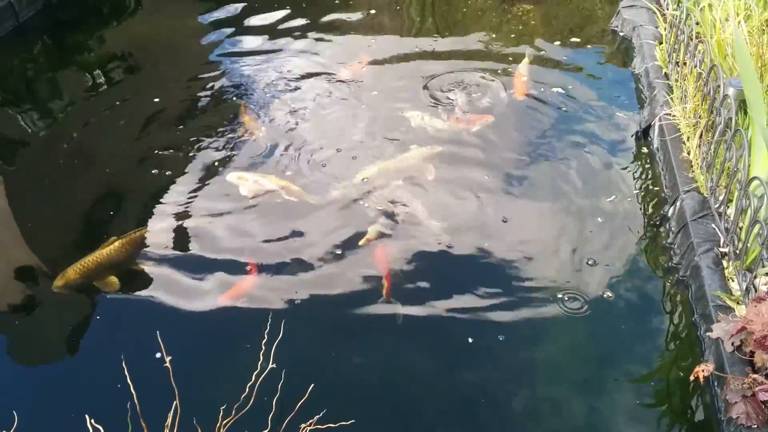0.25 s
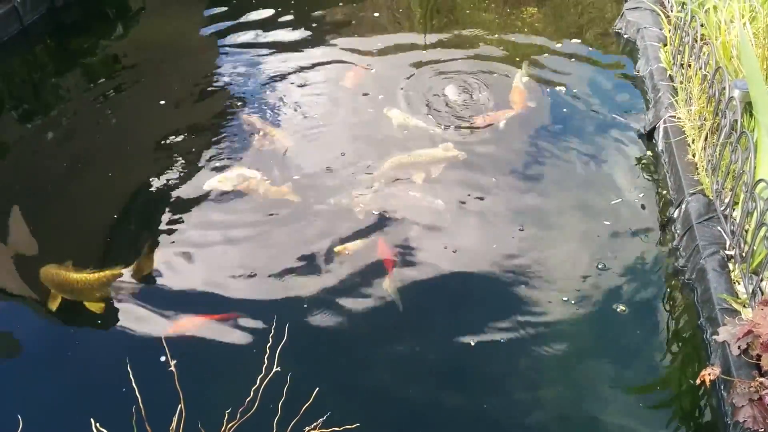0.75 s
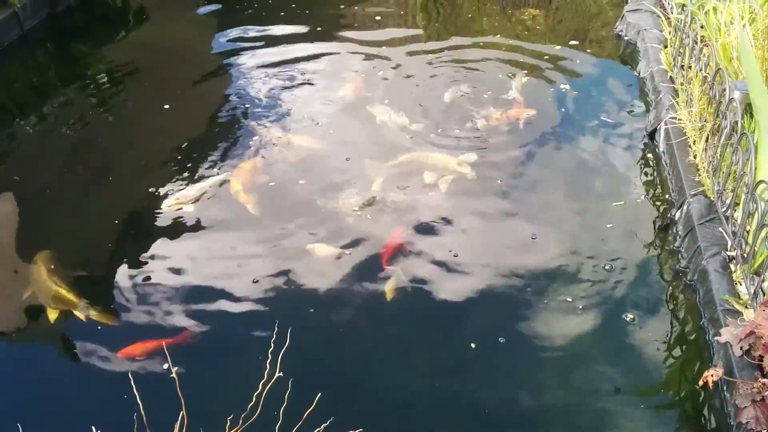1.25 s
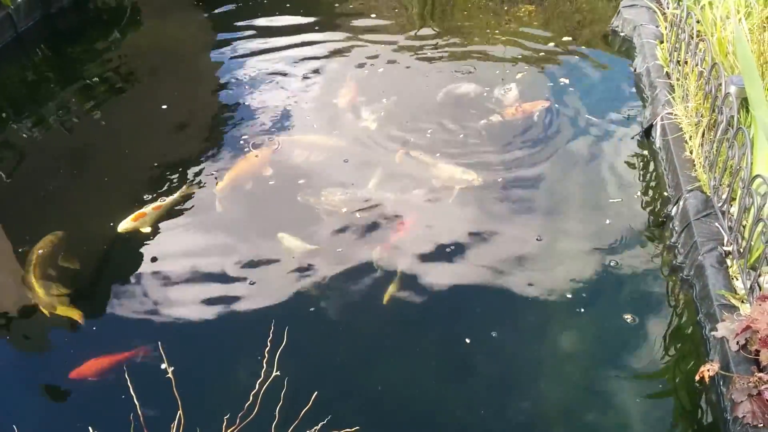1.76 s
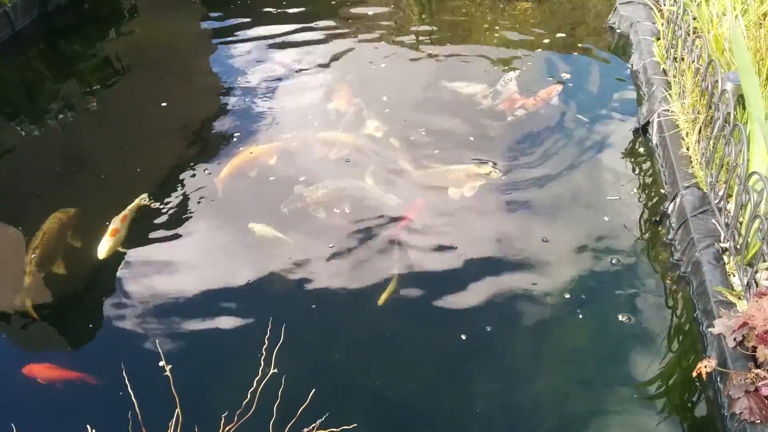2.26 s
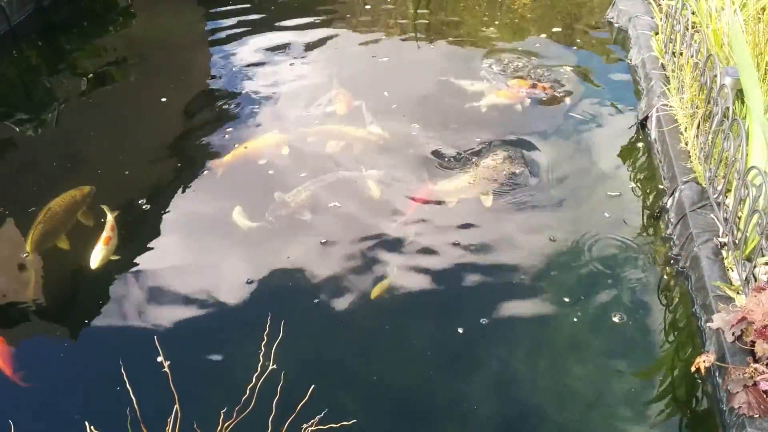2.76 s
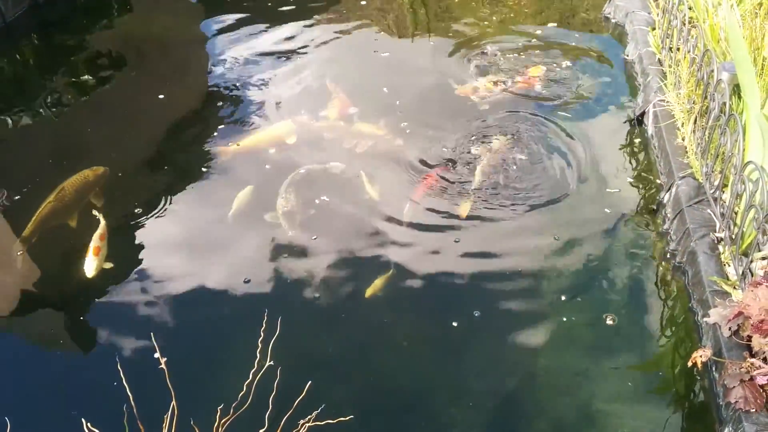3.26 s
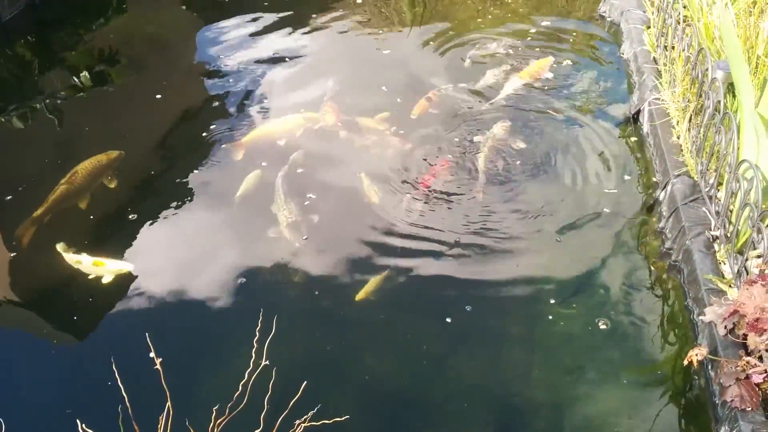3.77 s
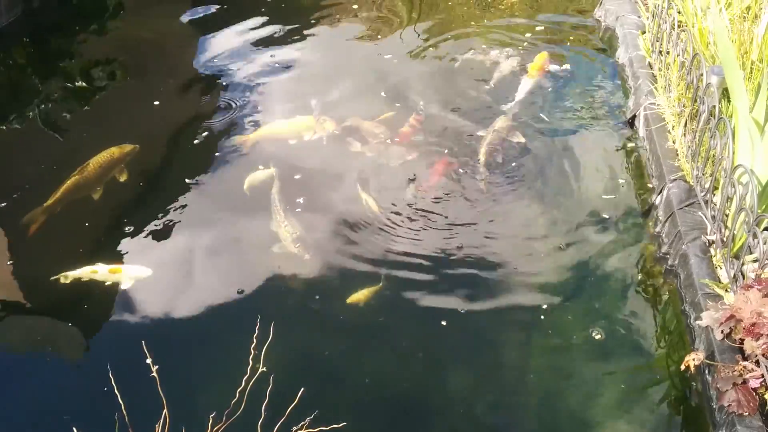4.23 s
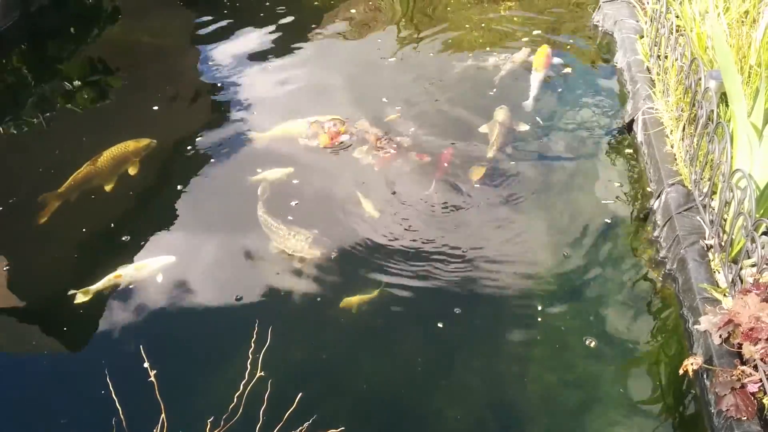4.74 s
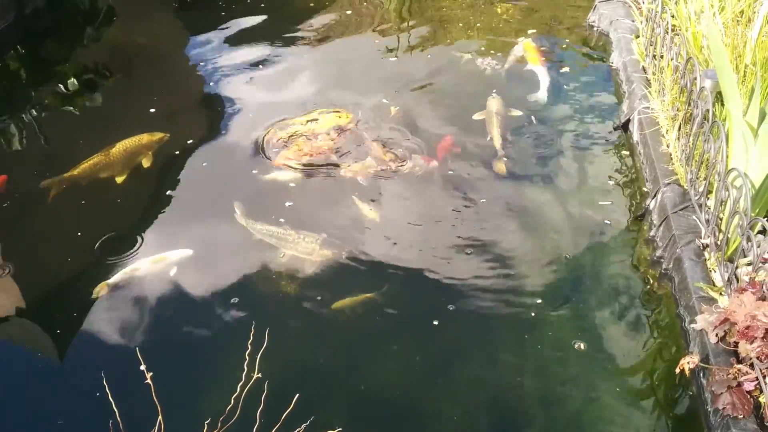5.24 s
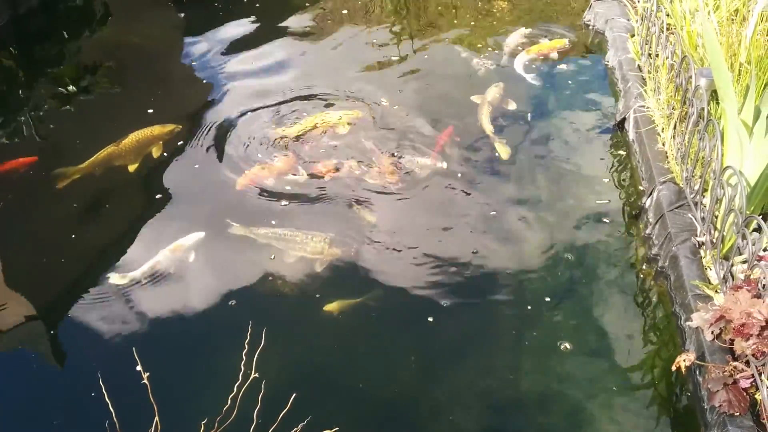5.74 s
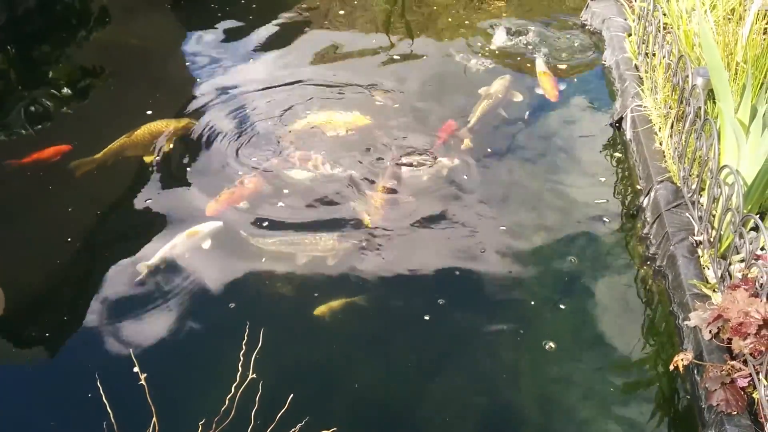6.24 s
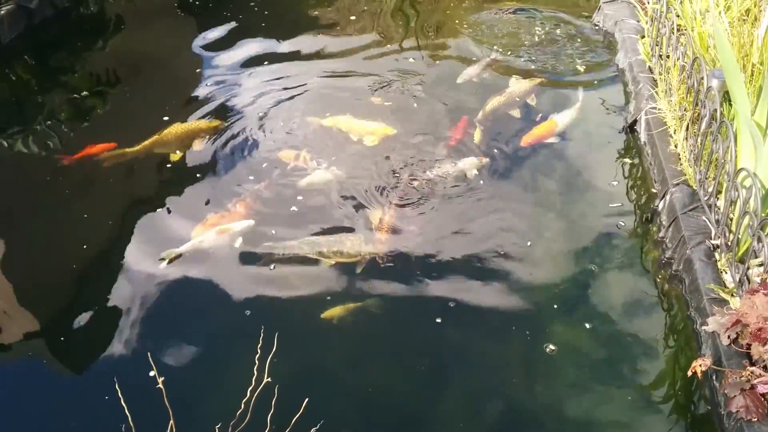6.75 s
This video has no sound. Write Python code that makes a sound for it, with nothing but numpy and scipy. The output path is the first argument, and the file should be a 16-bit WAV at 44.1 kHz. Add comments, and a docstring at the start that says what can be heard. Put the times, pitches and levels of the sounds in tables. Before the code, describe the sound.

Close outdoor sound of koi feeding at a garden pond: faint trickling and small wet smacks throughout. A hoarse hiss nearby grows in short draws, then breaks into two runs of rattling, splash-like bursts, the second much louder and brighter. Light wind bumps the microphone. Afterwards it is quiet, with a thin squeaky slurp, then a flurry of plops and droplets near the end.

```python
"""Koi feed at the surface of a garden pond: all along, torn films of water smack and fine spray trickles.
From 0.7 s a hoarse hiss nearby, noise in resonances, swells and breaks into two runs of rattling bursts.
From 1.2 to 4.2 s light puffs of air, wavering low tones with noise, bump the microphone.
At 4.5 s a faint high hiss leads to a thin, squeaky slurp, noise in a moving resonance.
Ringing bubbles plop and droplets tick, thickest near 6 s; a low breeze and a short garden echo surround it."""
import sys
import numpy as np
from scipy import signal
from scipy.fft import rfft, irfft, next_fast_len
from scipy.io import wavfile
from scipy.ndimage import uniform_filter1d, map_coordinates

SR = 44100
rng = np.random.default_rng(int(sys.argv[2]) if len(sys.argv) > 2 else 0)


def put_to_file(sound):
    """Save the sound as 16-bit audio at rate SR, in the file named by the first command-line argument."""
    columns = np.atleast_2d(sound).T  # one column per channel
    safe = np.clip(columns, -1, 1)
    whole_steps = np.round(safe * 32767)
    wavfile.write(sys.argv[1], SR, whole_steps.astype(np.int16))


N = 308698

# lip smacks and small splashes: (t/s, relative level/dB, centre f/Hz, spread/octaves, fade/s)
SMACK_EVENTS = [(.191, -41.5, 900, 0.75, 0.01), (.272, -58, 1520, 0.72, .01), (0.577, -40, 1945, .6, .007),
                (.594, -46.5, 2484, 1.63, .012), (0.958, -44.5, 2710, 0.42, .004),
                (1.125, -50, 3330, .25, .017), (2.313, -35.5, 3030, 1.68, .006),
                (2.333, -49, 1580, 0.63, .028), (3.321, -44, 2180, 0.98, .007),
                (3.828, -47.5, 1393, 0.83, .019), (3.845, -44.5, 2390, 0.78, .006),
                (3.926, -58.5, 1394, 1.25, 0.019), (4.111, -46, 1040, 1.12, .009),
                (4.152, -45, 2690, 1.19, .008), (4.539, -54.5, 1770, 1.65, .006),
                (4.921, -48.5, 2860, 0.76, .005), (5.047, -38, 3250, 0.26, .006),
                (5.11, -52.5, 974, 0.75, .035), (5.34, -49.5, 2160, 1.33, .014),
                (5.711, -59, 2490, 1.1, .019), (5.836, -50.5, 3330, 0.95, .004),
                (5.99, -46.5, 3830, 0.59, .005), (6.056, -45, 1490, 0.55, .016),
                (6.089, -40, 1850, 0.836, .008), (6.138, -42.5, 1304, 0.82, .0045),
                (6.155, -61, 3330, 1, 0.033), (6.16, -42, 735, 1, .012), (6.194, -44.5, 1207, 1.3, .017),
                (6.224, -40, 1005, 0.68, .0055), (6.445, -38, 2640, 0.81, .0095)]


def amp(db):
    """Turn decibels into a gain."""
    return 10 ** (np.asarray(db) / 20)


def unit(x):
    """Scale to an average strength (rms) of 1."""
    return x / np.sqrt(np.mean(x ** 2) + 1e-20)


def along(points, hz):
    """Read a curve of (f/Hz, value) points, with frequency on a log axis."""
    f, v = np.transpose(points)
    return np.interp(np.log(hz + 1), np.log(f + 1), v)


def clock():
    """Give the time of every sample in seconds."""
    return np.arange(N) / SR


def curves(rows):
    """Give the gain at every sample (next to nothing outside the rows), then any further columns."""
    s, db, *cols = np.transpose(rows)
    gain = amp(np.interp(clock(), s, db, left=-140, right=-140))
    return [gain] + [np.interp(clock(), s, c) for c in cols]


def wobble(rate):
    """Draw a smooth random curve through `rate` random points a second."""
    return map_coordinates(rng.standard_normal(8192), [clock() * rate], mode="wrap")


def held(start, length, attack, release):
    """Make an envelope that rises, holds and dies away; all times in seconds."""
    t = clock() - start
    return np.clip(t / attack, 0, 1) * np.exp(-np.maximum(t - length, 0) / release)


def patches(shape, size):
    """Draw random blotches of rms 1 over frequency and time, `size` cells across."""
    cells = rng.standard_normal(shape)
    return unit(uniform_filter1d(uniform_filter1d(cells, size, axis=0), size, axis=1))


def filtered(x, response):
    """Multiply the spectrum of x by a gain that depends on frequency."""
    m = next_fast_len(len(x) + 4096)
    return irfft(rfft(x, m) * response(np.fft.rfftfreq(m, 1 / SR)), m)[:len(x)]


def coloured(x, spectrum):
    """Shape x with a (f/Hz, level/dB) spectrum, at rms 1."""
    return unit(filtered(x, lambda hz: amp(along(spectrum, hz))))


def band(x, centre_hz, octaves):
    """Keep a bell-shaped band of x around one frequency, at rms 1."""
    return unit(filtered(x, lambda hz: (1 + (np.log2((hz + 1) / centre_hz) / octaves) ** 2 / 2) ** -2))


def add(track, s, sound):
    """Mix a sound in at time s."""
    start = int(np.clip(round(s * SR), 0, N))
    track[start:start + len(sound)] += sound[:N - start]


def air(level_db=-71.5, sway_db=2.5, patchy_db=3.5, breeze_hz=85, breeze_db=2.5):
    """The quiet outdoor background is noise, uneven in time and pitch, over the low rumble of a breeze."""
    # colour of the background: (f/Hz, relative level/dB)
    floor_colour = [(25, -23.5), (90, -5), (160, -15.5), (200, 1), (260, -8), (450, -6.5), (650, -5),
                    (1200, -14.5), (3900, -20), (4600, -34), (6500, -34), (9000, -40), (12000, -29.5),
                    (15500, -35.5)]
    # strength of the breeze, before breeze_db: (t/s, level/dB)
    breeze_levels = [(0.0, -86), (0.84, -81.5), (1.5, -71), (2.53, -85.5), (3.04, -78), (6.41, -86.5),
                     (6.76, -74), (7.0, -78.5)]
    z = signal.stft(rng.standard_normal(N), nperseg=512)[2]
    patchy = signal.istft(z * amp(patchy_db * patches(z.shape, size=5)), nperseg=512)[1][:N]
    rumble = band(rng.standard_normal(N), breeze_hz, octaves=0.96)
    breeze = amp(breeze_db) * curves(breeze_levels)[0] * rumble
    return amp(level_db + sway_db * wobble(6.9)) * coloured(patchy, floor_colour) + breeze


def puffs(gain_db=-4.5, half_cycles=0.7, turbulence=0.88, corner_hz=210):
    """Each eddy of air pushes the microphone to and fro once or twice, with some low noise."""
    # puffs of air: (t/s, level before gain_db/dB, pitch f/Hz)
    puff_events = [(1.238, -40, 65), (1.288, -39.5, 90), (1.532, -43.5, 90), (1.613, -48, 70),
                   (1.69, -48, 64), (1.911, -46, 79.5), (1.963, -47, 74.7), (3.203, -39.5, 79.9),
                   (3.32, -46, 80), (3.9, -46, 61.5), (3.93, -47.5, 90), (3.971, -46, 57),
                   (4.05, -41.5, 74), (4.118, -35, 118)]
    out, t = np.zeros(N), np.arange(-SR // 12, SR // 12) / SR
    for s, db, hz in puff_events:
        half = half_cycles / hz
        swing = np.sin(2 * np.pi * (hz * t + rng.random()))
        push = swing + turbulence * band(rng.standard_normal(len(t)), hz, octaves=0.99)
        add(out, s + t[0], amp(db + gain_db) * np.exp(-(t / half) ** 2 / 2) * push)
    return filtered(out, lambda hz: 1 / np.hypot(1, (hz / corner_hz) ** 2))


def slurp(grain_db=2, thin_db=-69.5, thin_hz=7600, thin_octaves=0.22):
    """Air sucked through a narrow wet gap: a faint hiss, then a whistle that opens into a ragged rush."""
    # the whistle and rush: (t/s, level/dB, resonance f/Hz, width/Hz)
    slurp_path = [(4.88, -57, 3220, 91), (4.925, -53.5, 3170, 70), (5.03, -68, 3300, 90),
                  (5.05, -45, 3100, 680), (5.135, -47.5, 4320, 1000), (5.165, -67, 4150, 500),
                  (5.2, -52, 3900, 402), (5.25, -65, 3700, 300), (5.4, -74, 3320, 200)]
    gain, centre, width = curves(slurp_path)
    hz, s, z = signal.stft(rng.standard_normal(N), SR, nperseg=512)
    centre, width = np.interp(s, clock(), centre), np.interp(s, clock(), width)
    off = (hz[:, None] - centre) / width
    gap = (1 + off ** 2 / 4) ** np.where(off > 0, -3.5, -2)  # falls off faster above the resonance
    gap = gap * amp(4.5 * patches(z.shape, size=3))
    rush = unit(signal.istft(z * gap / np.linalg.norm(gap, axis=0), SR, nperseg=512)[1][:N])
    ragged = gain * rush * amp(grain_db * wobble(200))
    thin = amp(thin_db) * held(4.45, length=.27, attack=.07, release=.095)
    return ragged + thin * band(rng.standard_normal(N), thin_hz, thin_octaves)


def hiss_force(attack_s=.043, release_s=.012, growth_db_per_s=22, flutter_db=2, flutter_rate=45):
    """Gain of the hiss: each draw starts softly, grows and stops; it flutters less as it gets stronger."""
    # draws of the hiss: (start t/s, length/s, level at the end/dB)
    hiss_draws = [(.72, .08, -55), (.84, .158, -49), (1.025, .05, -47), (1.09, .298, -41),
                  (1.512, .17, -36.3)]
    t, draws = clock(), np.zeros(N)
    for s, length, db in hiss_draws:
        growth = amp(db + growth_db_per_s * np.minimum(t - s - length, 0))
        draws += held(s, length, attack_s, release_s) * growth
    return draws * amp(flutter_db * (1.5 - draws / draws.max()) * wobble(flutter_rate))


def rasp(grain_db=2.2, grain_rate=450, bite=0.85, echo_s=.00581, echo_share=0.36, treble_hz=6800,
         tube_hz=2690, tube_db=4, low_hz=1560, high_hz=3150):
    """Gritty noise in broad resonances: first a hiss, then bursts that brighten as they crest."""
    # colours from soft to fierce: (f/Hz, relative level/dB)
    gentle, hoarse, fierce = [(400, -16.5), (1150, -8.5), (1550, 1.5), (2000, 0.5), (2400, -11.5),
                              (2900, 5.5), (3200, -5), (3600, -35), (4500, -26), (6700, -30.5), (7700, -14),
                              (9000, -33.5), (15000, -40)], [(400, -32.5), (700, -12.5), (1000, -12.5), (1550, 5.5),
                                              (2050, 4.5), (2400, -7.5), (2820, 4), (3200, -14.5),
                                              (4200, -15.5), (4750, -33.5), (5400, -13), (7000, -28),
                                              (8400, -21.5), (15000, -54)], [(400, -44.5), (1000, -24.5), (1600, -13),
                                                              (2400, 3), (2850, 0), (3150, -12),
                                                              (4300, -8.5), (5150, -1.5), (6600, -15),
                                                              (7800, -19), (8300, -14.5), (11000, -28),
                                                              (15000, -42)]
    # rattling bursts: (t of the crest/s, level/dB, swell/s)
    bursts = [(1.767, -31, .025), (1.861, -29.5, .027), (1.956, -28.5, 0.025), (2.051, -28, 0.026),
              (2.16, -28.5, 0.034), (2.435, -28, 0.0066), (2.46, -21, .016), (2.532, -21.2, 0.021),
              (2.619, -20.7, .02), (2.716, -21.1, .0185), (2.824, -21.6, .018)]
    t = clock()
    grit = rng.standard_normal(N) * amp(grain_db * np.tanh(wobble(grain_rate)))
    # at middling force the sound is hollow, with the evenly spaced peaks of a short tube
    hollow = filtered(grit, lambda hz: amp(tube_db * np.cos(2 * np.pi * hz / tube_hz)))
    colours = [coloured(grit, gentle), coloured(hollow, hoarse), coloured(grit, fierce)]

    def blend(harsh, part):
        """Fade between the three colours as harshness goes from 0 to 1."""
        place = 2 * np.clip(harsh, 0, 1)
        return sum(c[part] * np.clip(1 - abs(place - k), 0, 1) for k, c in enumerate(colours))

    # the hiss starts pinched into two narrow resonances, which mostly give way to the broad colours
    narrow = unit(band(grit, low_hz, octaves=0.074) + band(grit, high_hz, octaves=0.14))
    pinched = np.interp(t, [1.05, 1.4], [.53, .1])
    broad = blend(np.interp(t, [1.35, 1.62], [.02, .27]), slice(N))
    out = hiss_force() * (pinched * narrow + (1 - pinched) * broad)
    for s, db, swell in bursts:
        fade = 0.87 * swell  # a burst dies a little faster than it swells
        harsh = 1 + 0.0524 * (db + 19.5)  # the louder, the harsher
        near = abs(t - s) < .15
        away = (t[near] - s) / np.where(t[near] < s, swell, fade)
        flow = np.exp(1.42 * (.5 - np.hypot(away, .5)))  # a spindle with a rounded crest
        flow *= np.clip(2 * away + 3.63, 0, 1)  # each burst starts from nothing
        noise = blend(harsh, near)
        treble = filtered(noise, lambda hz: 1 / (1 + (treble_hz / (hz + 1)) ** 8))
        out[near] += amp(db) * flow * (noise - treble + treble * flow ** bite)
    # one near reflection combs the spectrum
    return out + echo_share * np.interp(t - echo_s, t, out)


def stir(calm_db=-81, stir_db=-75.5, settle_s=0.12):
    """Gain of the fine spray: the water grows busy around every smack and settles again."""
    t = clock()
    busy = sum(np.exp(-abs(t - s) / settle_s) for s, *_ in SMACK_EVENTS)
    return np.sqrt(amp(calm_db) ** 2 + amp(stir_db) ** 2 * busy)


def fizz(times, pitches, sizes, cycles, rise):
    """A cloud of tiny bubbles, each ringing for a few cycles with rising pitch; times count from zero."""
    t = np.arange(SR // 25) / SR
    age = t * pitches[:, None] / cycles
    swell = sizes[:, None] * age * np.exp(1 - age)
    rings = swell * np.sin(2 * np.pi * pitches[:, None] * t * (1 + rise * t))
    places = (times * SR).astype(int)[:, None] + np.arange(len(t))
    return np.bincount(places.ravel(), rings.ravel())


def trickle(count=1800, level_db=-73.0, low_hz=450, high_hz=4300, tilt_db=-0.6, rise=2.2, follow=0.88):
    """Tiny bubbles burst all over the rippling pond; the small, high ones are weaker and ring more cycles."""
    when, where = rng.random((2, count))
    octave = where * np.log2(high_hz / low_hz)
    scatter_db = 6 * np.clip(rng.standard_normal(count), -2, 2)
    cycles = 3.5 + 1.5 * octave[:, None]
    sizes = amp(level_db + tilt_db * octave + scatter_db)
    out = np.zeros(N)
    add(out, 0, fizz(when * N / SR, low_hz * 2 ** octave, sizes, cycles, rise))
    return out * unit(stir()) ** follow  # busier water trickles louder


def droplets(fade=0.0049, rise_s=0.0012, spatter_db=-2.0, drop_rate=400, tick_db=-7.5):
    """Falling spray makes bright ticks of noise: a few clear ones over a fine, irregular crackle."""
    # clear drops: (t/s, level before tick_db/dB)
    clear_drops = [(0.5994, -54.5), (0.7168, -49.5), (0.9044, -51.5), (2.2254, -56), (2.2468, -48),
                   (2.3111, -26), (3.8262, -45.5), (4.0482, -45.5), (4.145, -46.5), (4.5354, -45),
                   (5.2604, -54), (5.8366, -49), (6.1863, -42.5), (6.4497, -47.5)]
    # colour of the spray: (f/Hz, relative level/dB)
    spray_colour = [(500, -25), (3000, -7.5), (6000, -8.5), (8800, 0), (12000, -12), (15500, -17)]
    t = np.arange(SR // 25) / SR - .005
    tick = np.exp(np.minimum(t / rise_s, -t / fade))
    sizes = amp(5 * np.clip(rng.standard_normal(N), -2.3, 2.3))
    landings = sizes * (rng.random(N) < drop_rate / SR)  # drop_rate is drops a second
    # the powers of the overlapping tiny drops add up
    crackle = unit(np.sqrt(abs(signal.fftconvolve(landings ** 2, tick ** 2)[:N])))
    out = amp(spatter_db) * stir() * crackle * coloured(rng.standard_normal(N), spray_colour)
    for s, db in clear_drops:
        noise = coloured(rng.standard_normal(len(t)), spray_colour)
        add(out, s + t[0], amp(db + tick_db) * tick * noise)
    return out


def bubble(hz, rise, life):
    """A pocket of air rings and climbs in pitch as it nears the surface; its neck flutters."""
    t = np.arange(int(5 * life * SR)) / SR
    shape = (1 - np.exp(-t / (0.11 * life))) * np.exp(-(t / (1.14 * life)) ** 1.8)
    flutter = map_coordinates(rng.standard_normal(256), [t * 250], mode="wrap")
    pitch = hz * 2 ** (np.minimum(rise * t, 1.5) + .02 * flutter)  # climbs 1.5 octaves at most
    return shape / shape.max() * amp(2 * flutter) * np.sin(2 * np.pi * np.cumsum(pitch) / SR)


def plops(ring_cycles=15, escape_octaves_per_s=92):
    """The larger bubbles that the fish gulp and release ring for fewer cycles if they climb fast."""
    # single bubbles: (t/s, level/dB, pitch f/Hz, rise/octaves per s)
    bubble_events = [(2.341, -43, 1715, 3), (2.565, -35.5, 466, 23), (4.323, -56, 3910, 2),
                     (4.498, -49, 1825, 6), (4.538, -42, 3960, 2), (4.545, -45, 730, 36),
                     (4.75, -57, 477, 20), (5.59, -58, 724, 4.7), (5.941, -44.5, 636, 7.2),
                     (5.97, -39.5, 988, 43), (6.067, -24.5, 1968, 5), (6.149, -36.5, 905, 37),
                     (6.157, -47.5, 380, 7), (6.158, -52, 5400, 1), (6.192, -45, 4700, 1),
                     (6.22, -36.5, 1033, 51), (6.2, -51, 419, 8), (6.367, -51, 1790, 22),
                     (6.406, -51.5, 1930, 4.3)]
    out = np.zeros(N)
    for s, db, hz, rise in bubble_events:
        life = ring_cycles / hz * np.exp(-rise / escape_octaves_per_s)
        add(out, s, amp(db) * bubble(hz, rise, life))
    return out


def wet(x, edge_hz=4200, spray_db=-13):
    """Few bubbles are small enough to ring above the edge; only a little spray sounds there."""
    return filtered(x, lambda hz: amp(spray_db) + (1 - amp(spray_db)) / (1 + (hz / edge_hz) ** 20))


def smacks(count=12, cycles=3.4, rise=6, bubbles_db=-1.1, tear_db=-6, scatter_db=3):
    """A film of water tears at a fish's lips: a quick spurt that throws off a cluster of bubbles."""
    out, t = np.zeros(N), np.arange(SR // 4) / SR - .03
    for s, db, centre_hz, octaves, fade in SMACK_EVENTS:
        swell = np.exp(np.minimum(t / .004, -t / fade))
        tear = swell * band(rng.standard_normal(len(t)), centre_hz, octaves)
        add(out, s + t[0], amp(db + tear_db) * tear)
        born = fade * np.linspace(0, np.sqrt(2), count) ** 2  # dense at first, then sparser
        pitch, size = np.clip(rng.standard_normal((2, count)), -2, 2)
        pitches = centre_hz * 2 ** (.6 * octaves * pitch)
        sizes = amp(scatter_db * size) * np.exp(-born / fade)
        cloud = fizz(born, pitches, sizes, cycles, rise)
        match = np.linalg.norm(tear) / np.linalg.norm(cloud)  # ties the cluster's energy to the tear's
        add(out, s - .001, amp(db + bubbles_db) * cloud * match)
    return wet(out)


def banks(x, count=5, level_db=-15):
    """The pond's edges send back a few weak copies within moments."""
    t = clock()
    return x + amp(level_db) * sum(np.interp(t - delay, t, x) for delay in rng.uniform(.003, .018, count))


def garden(x, delay_s=.012):
    """Fences and walls return a short tail of noise that dies at its own speed in each pitch range."""
    # time for the echo to fall by 60 dB: (f/Hz, time/s)
    echo_times = [(300, 0.75), (2500, 0.2), (5500, 0.14), (11000, 0.28)]
    hz, t, z = signal.stft(rng.standard_normal(SR // 2), SR, nperseg=256)
    tail = signal.istft(z * amp(-60 * t / along(echo_times, hz)[:, None]), SR, nperseg=256)[1]
    return signal.fftconvolve(x, np.pad(tail / np.linalg.norm(tail), (int(delay_s * SR), 0)))[:N]


def scene(rasp_echo_db=-14, pond_echo_db=-16):
    """The pond, the rasp and their echo sound over the puffs and the background."""
    pond = banks(smacks() + plops() + trickle() + droplets()) + slurp()
    rattle = rasp()
    echo = garden(amp(rasp_echo_db) * rattle + amp(pond_echo_db) * pond)
    return (pond + rattle + echo + puffs() + air())[None]


def record(dry, low_hz=36, top_hz=15850):
    """The microphone's path rolls off the deep bass and keeps nothing above its band limit."""
    return filtered(dry[0], lambda hz: (hz < top_hz) / np.hypot(1, (low_hz / (hz + 1)) ** 2))[None]


dry = scene()
out = record(dry)
put_to_file(out)
```